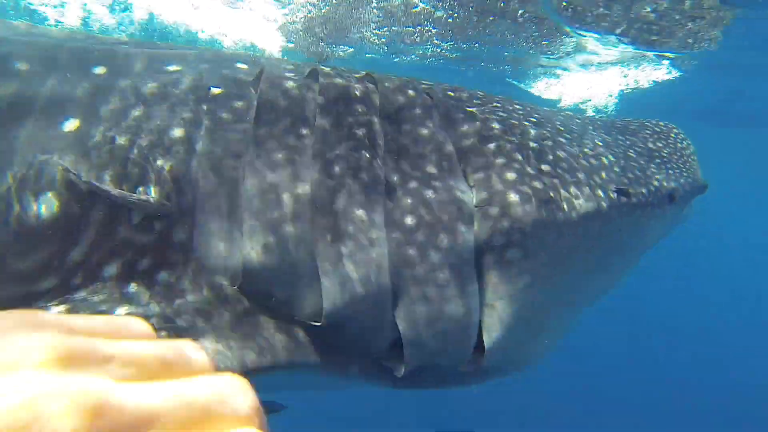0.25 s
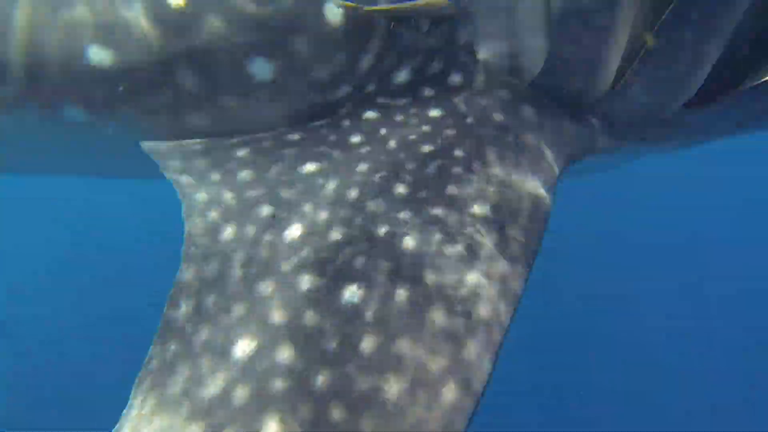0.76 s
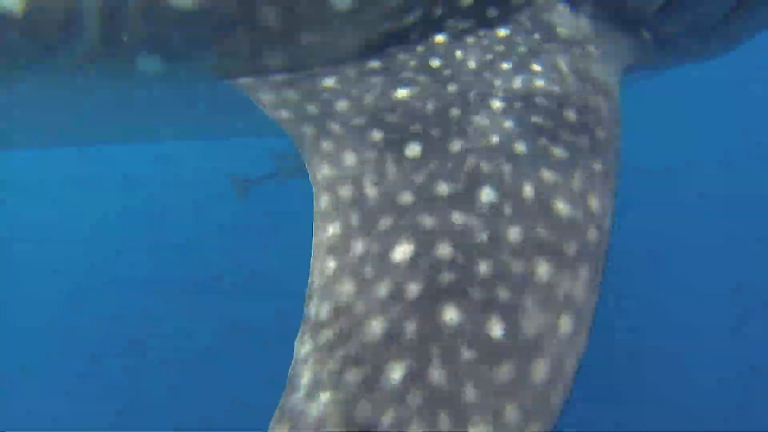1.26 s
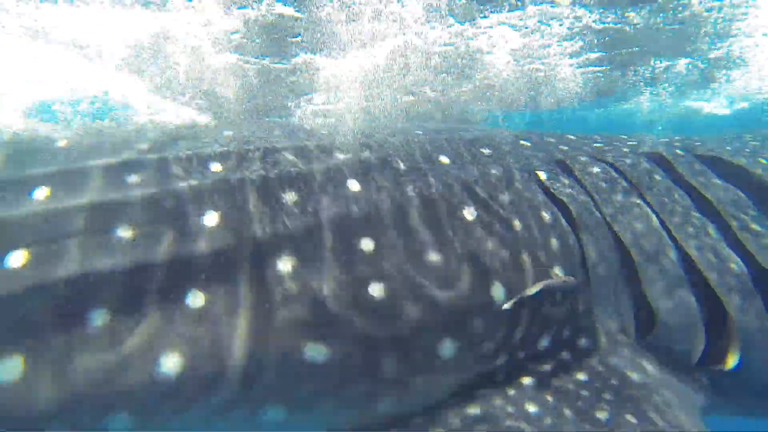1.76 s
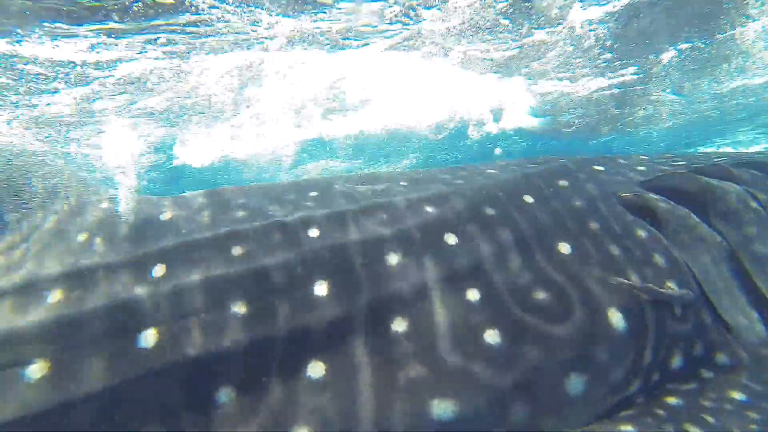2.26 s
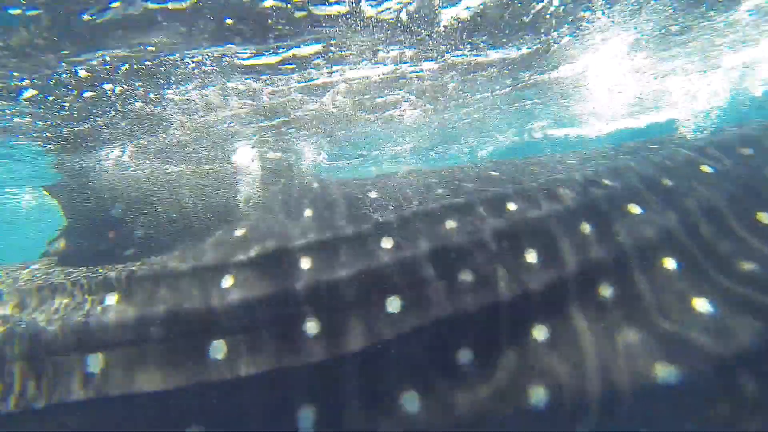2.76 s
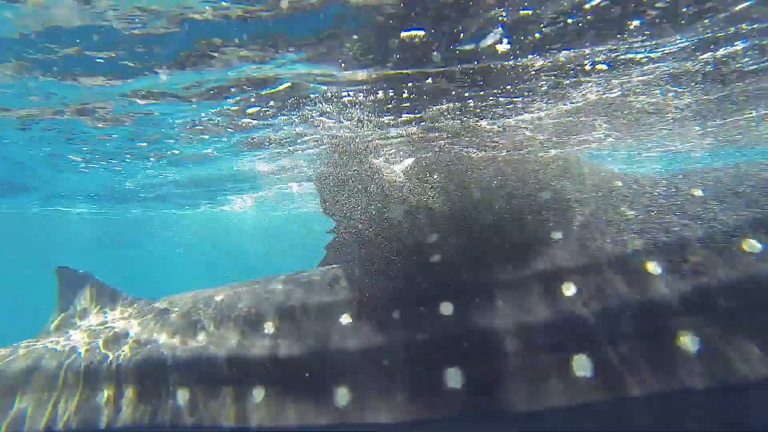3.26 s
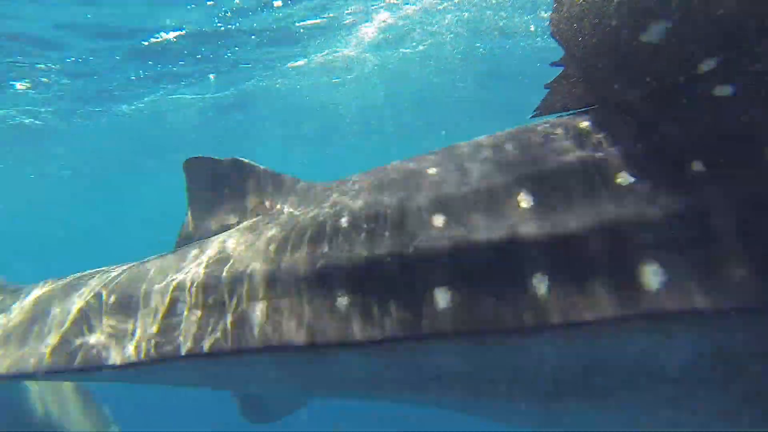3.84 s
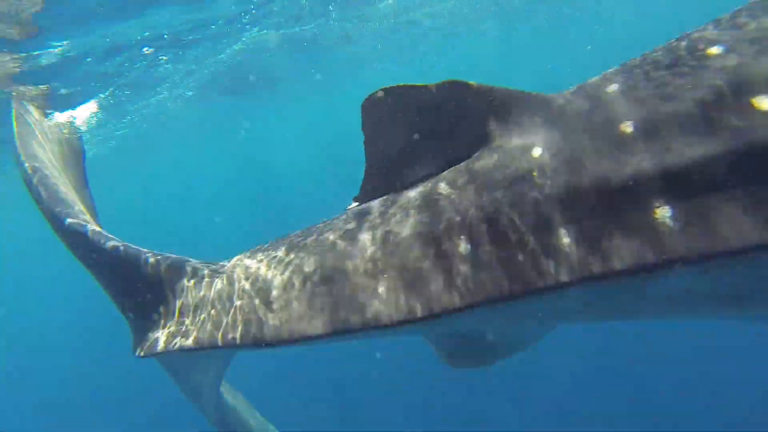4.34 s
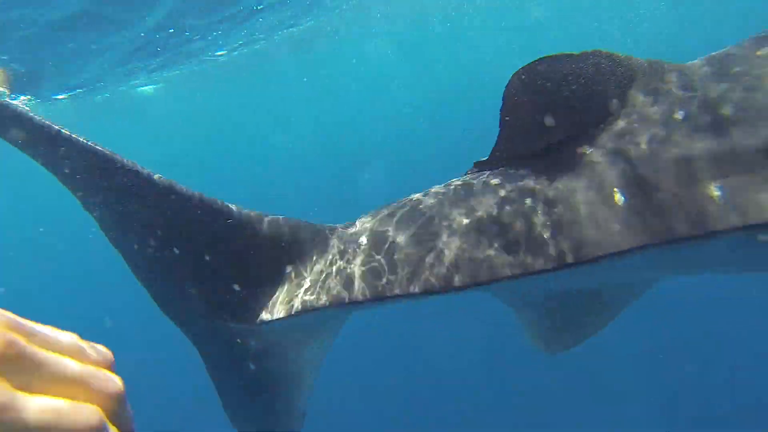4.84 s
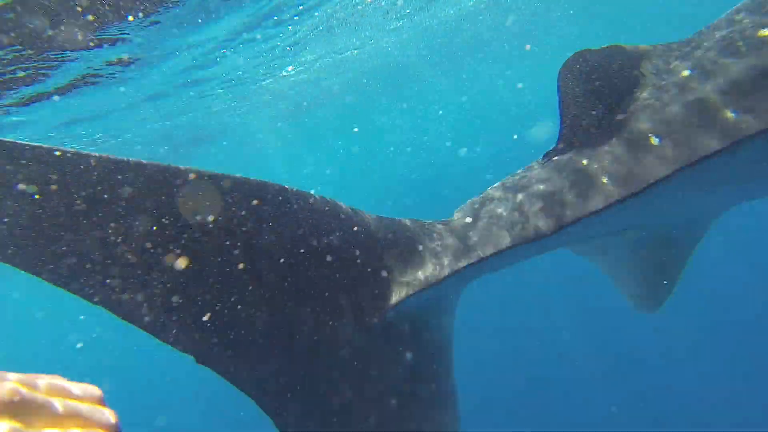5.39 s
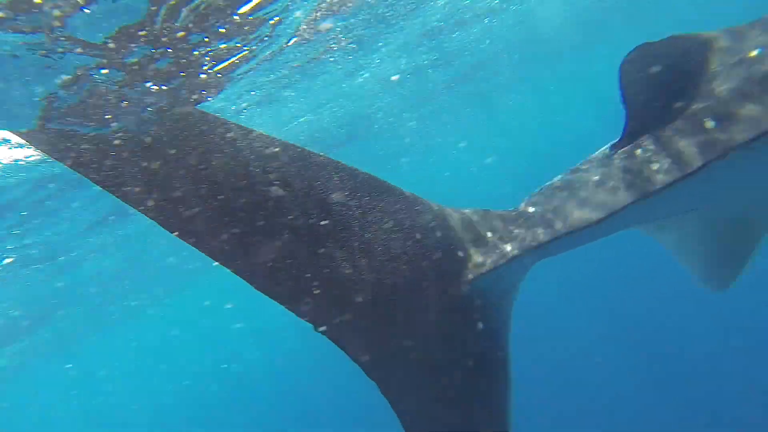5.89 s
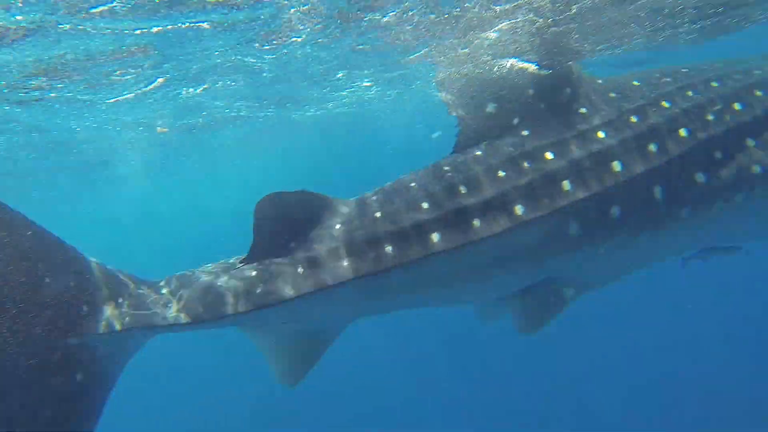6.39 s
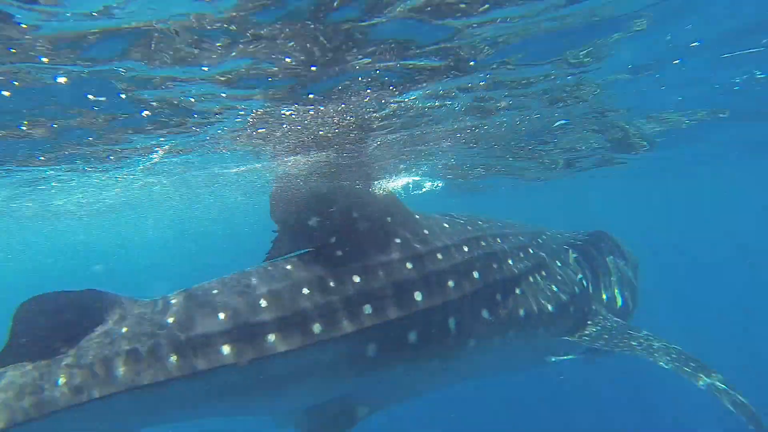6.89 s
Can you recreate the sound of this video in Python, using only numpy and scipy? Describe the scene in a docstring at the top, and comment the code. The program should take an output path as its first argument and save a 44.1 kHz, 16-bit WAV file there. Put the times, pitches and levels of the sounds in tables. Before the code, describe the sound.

Close, muffled underwater sound from a microphone in a hand-held case near the sea surface. A sharp bubble click opens, then a swimming stroke swells into heavy low gulps and burbling, strongest around 0.5-0.7 s. A second push surges at about 1.2 s, with deep thuds and gurgles, loosening by 2.3 s. A small splash of froth and a crisp plink come around 2.2-2.7 s. Water is calmer until 3.7 s, then rapid glugging builds to 4.2-4.6 s and trails off past 5 s. A bright burst of bubble plinks stands out at 5-5.1 s. Low shoves return from 5.5 s, and a final swirling, gulping stroke runs from 6 to 7 s. Throughout, an idling boat rattles and knocks in an even throb of nearly six pulses per second, clearer early and weaker after 3 s, amid fine fizz, smooth hiss and a barely audible whine.

```python
"""Swimming strokes just under the sea surface push water round a hand-held camera case.
Filtered noise makes the buffeting, burble and swirl; short wobbling tones make the gulps and gurgles.
Close bubbles plink as brief decaying sines. Behind them an evenly throbbing rattle of resonant noise
suggests an idling boat, in a fizz of random impulses, a smooth hiss and a faint electronic whine."""
import sys
import numpy as np
from scipy import signal
from scipy.fft import rfft, irfft, next_fast_len
from scipy.io import wavfile
from scipy.ndimage import uniform_filter1d

SR = 44100
rng = np.random.default_rng(int(sys.argv[2]) if len(sys.argv) > 2 else 0)


def file_out(sig):
    """Save sig as 16-bit WAV at sys.argv[1]."""
    # one column per channel
    cols = np.atleast_2d(sig).T
    # limit, then scale
    lim = np.clip(cols, -1, 1)
    pcm = np.round(lim * 32767).astype(np.int16)
    wavfile.write(sys.argv[1], SR, pcm)


N = 313992
T = np.arange(N) / SR

# whine of the camera's electronics: f/Hz, rms level/dB
WHINE_TONES = [(6594, -81.5), (8812, -86), (10429, -88.5), (13127, -89)]

# relative spectra of the tiny-bubble fizz, the even sea hiss and the churning froth: f/Hz, level/dB
FIZZ_SPECTRUM = [(2400, 1.5), (3300, -2), (4000, 3), (4450, -2.5), (4700, -0.5), (4900, -3.5), (5080, 0.5),
                 (5350, -13.5), (6400, -14.5), (9000, -17.5), (15000, -37)]
HISS_SPECTRUM = [(250, 21), (350, 17), (490, 10.5), (600, 1), (1300, 0), (4000, -11), (5800, -13),
                 (6350, -10), (7000, -14), (9300, -16.5), (11500, -20), (13500, -19.5), (14100, -26.5),
                 (15200, -21.5)]
CHURN_SPECTRUM = [(1400, -18.5), (1750, -0.5), (2050, -2.5), (2400, 3.5), (2850, -4.5), (3080, -1),
                  (3500, -8), (4100, -19), (5000, -31.5)]
# fizz fader, before a fixed lift: t/s, level/dB
FIZZ_LEVEL = [(0, -49.5), (.2, -53.5), (.7, -55), (1.22, -55), (1.7, -57.5), (3.4, -56.5), (4.8, -59.5),
              (5.1, -57.5), (5.5, -57), (7.12, -54)]
# froth splashing at the surface, before a fixed lift: t/s, peak level/dB, length/s
SPLASHES_OF_FROTH = [(0.243, -44, 0.24), (1.004, -53, .05), (1.282, -46.5, 0.087), (2.19, -46.5, .12),
                     (2.281, -40.5, 0.023), (2.564, -41, 0.036), (2.74, -47, .07), (2.65, -51.5, 1),
                     (4.503, -49.5, 0.99), (5.12, -44, 0.51), (6.903, -46, 0.028), (6.98, -43.5, 0.015),
                     (7.102, -46.5, 0.043)]
SIMMER_DB = -51.5  # froth between splashes, before the same lift
GUST_DB, BURST_SPREAD_DB = 1.5, 5.2  # gusting of the churn; unevenness of its tiny bursts

# resonances of the boat through the case: f/Hz, width/Hz, relative level/dB
BOAT_RESONANCES = [(699, 73, -9.5), (940, 830, -18.5), (845, 63, -5), (1041, 120, -11), (1205, 72, -6.5),
                   (1546, 99, -5.5), (1758, 235, 1.5), (1847, 120, -2.5), (2283, 152, -1.5),
                   (2434, 610, -9.5), (2750, 50, -8.5), (2980, 210, -14)]
# boat fader as the case turns, before a fixed trim: t/s, level/dB
BOAT_LEVEL = [(0, -36.5), (.45, -39.5), (.65, -38), (.85, -38.5), (1.0, -37.5), (1.33, -35.5), (1.6, -38),
              (2.05, -38), (2.4, -37), (2.6, -38.5), (3.0, -41.5), (3.55, -46.5), (4.15, -43),
              (4.75, -43.5), (5.15, -40.5), (5.75, -43.5), (6.35, -42), (6.8, -42), (7.12, -42.5)]
# shaft speed: t/s, turn rate/Hz
SHAFT_SPEED = [(0, 5.699), (3, 5.69), (4.5, 5.7), (5.7, 5.81), (7.12, 5.71)]
# loudness through one turn, with two knocks: share of the turn, relative level/dB
TURN_SHAPE = [(0, -2.2), (.3, -3.8), (.42, -3.2), (.48, 2.6), (.53, 3.6), (.59, 1.2), (.69, 4.5),
              (.76, 1.4), (.82, -1.6), (.9, -.8)]
# depth of the throb: t/s, factor on the dB of the turn shape
THROB_DEPTH_CURVE = [(0, 1), (1.7, 0.93), (2.3, 0.84), (7.12, 1)]
RATTLE_ROUGH_DB = 1.8

# single near bubbles: t/s, f/Hz, level/dB, ring t60/s, start pitch over final pitch
NEAR_BUBBLES = [(.009, 1000, -13.5, 0.0055, 0.87), (0.017, 487, -30.5, 0.035, 2.3),
                (0.159, 423, -25, 0.033, 0.71), (1.165, 4100, -35, .012, 1.05),
                (1.254, 428, -24, 0.045, 0.6), (1.3075, 4570, -25.5, 0.013, 1.05),
                (2.248, 2800, -27.5, 0.021, 1.14), (2.58, 4600, -28, .003, 1.2),
                (2.626, 2700, -13, 0.0047, 1), (3.062, 354, -29, 0.023, 1.6),
                (3.473, 850, -30.5, 0.036, 0.94), (3.476, 336, -31, .03, 1.3),
                (3.535, 1220, -40, .03, 0.81), (3.546, 1530, -33, 0.03, 0.9),
                (3.833, 4750, -40, 0.015, 1.03), (4.106, 6200, -44, 0.013, 1.2),
                (4.435, 3586, -28.5, 0.014, 0.84), (4.57, 4700, -39, .008, 1.05),
                (4.600, 337, -31, 0.15, 0.72), (4.9783, 3020, -3, 0.014, 1.15),
                (4.995, 2360, -21, 0.022, 0.87), (5.031, 540, -35, 0.041, 1.2),
                (5.062, 520, -37, 0.068, 1.1), (5.051, 2800, -26, 0.022, 1.1),
                (5.060, 3203, -23, 0.012, 1.1), (5.0668, 5230, -14, 0.0011, 0.92),
                (5.0678, 4660, -26, 0.0083, 1), (5.0712, 7700, -34, 0.0039, 1.17),
                (5.079, 1687, -16.5, 0.03, 1.28), (5.087, 6320, -36, 0.013, 1.03),
                (5.099, 3650, -22.5, 0.017, 0.98), (5.1205, 820, -27.5, 0.037, 1.6),
                (5.203, 6100, -43, .008, 1.05), (5.3607, 3750, -27, 0.012, 0.64),
                (5.866, 7450, -33, 0.006, 1.05), (5.917, 3610, -32, 0.013, 1.03),
                (5.931, 5000, -33, .002, 1.2), (6.046, 378, -27, 0.059, 1.1),
                (6.076, 2210, -27, 0.028, 1.14), (6.131, 1240, -35, 0.05, 1.3),
                (6.233, 3100, -32, .018, 0.82), (6.385, 430, -33, 0.06, 0.73)]
# drifting clouds of small bubbles: t/s, spread/s, level of the strongest/dB, bubble rate/Hz
BUBBLE_CLOUDS = [(4.72, 0.15, -34, 114), (5.14, 0.095, -31, 210), (5.36, .03, -37, 220)]

# relative spectra of the buffeting, burble and swirl: f/Hz, level/dB
BUFFET_SPECTRUM = [(5, -25), (10, -7), (18, -2), (27, 1), (37, -9), (50, -11), (68, -16), (100, -30),
                   (200, -60)]
BURBLE_SPECTRUM = [(50, -22), (70, -7.5), (83, 5), (96, -3.5), (116, 5), (135, -8.5), (160, -7), (220, -26)]
SWIRL_SPECTRUM = [(100, -1), (145, 0.5), (185, 5), (260, -1.5), (340, -7.5), (400, -19.5), (500, -20.5),
                  (600, -28.5), (1200, -31.5)]
# deep buffeting fader: t/s, level/dB
BUFFET_LEVEL = [(0, -25), (.25, -32.5), (.7, -20.5), (1.3, -21.5), (1.95, -22), (2.25, -31), (3.1, -27.5),
                (3.8, -31.5), (4.35, -25.5), (4.8, -27), (5.7, -32), (6.15, -22.5), (6.55, -28.5),
                (7.12, -24.5)]
# slow shoves of water on the case: t/s, f/Hz, peak level/dB, length/s
WATER_SHOVES = [(.952, 32.3, -15, 0.029), (1.24, 27.2, -17, 0.036), (1.385, 28.5, -7, 0.033),
                (2.925, 62, -22, .035), (4.35, 27.5, -15.5, 0.0805), (4.452, 75, -16, .03),
                (4.635, 68.3, -20, .04), (5.49, 26.3, -15, 0.055), (5.82, 26.7, -12.5, 0.033),
                (5.982, 33.5, -10, 0.035), (6.035, 27.6, -17, .035), (6.23, 30, -17.5, 0.038)]
# separate gulps of churned air: t/s, f/Hz, peak level/dB, length/s
AIR_GULPS = [(.105, 116.8, -26.5, 0.034), (.17, 124, -25.5, 0.029), (.244, 123, -21.5, .04),
             (.3, 125.8, -19.5, 0.045), (.41, 119.8, -16.5, 0.037), (.482, 117.6, -11, .052),
             (.535, 117.7, -13, 0.027), (.585, 128, -11, 0.05), (.643, 122.2, -8.5, 0.034),
             (.717, 110.3, -14.5, 0.041), (.777, 111.5, -15.5, 0.033), (.83, 107.6, -23, 0.026),
             (.93, 113, -32, 0.026), (.995, 117, -28, .03), (1.05, 112.6, -29, 0.027),
             (1.115, 120, -28.5, .028), (1.187, 132.4, -17.5, 0.02), (1.303, 130, -18.5, 0.019),
             (1.37, 128, -11, 0.024), (1.429, 126.4, -15, 0.023), (1.489, 131.6, -11.5, 0.028),
             (1.562, 117.4, -16.5, 0.026), (1.627, 116.3, -21, 0.028), (1.745, 109, -13, 0.026),
             (1.832, 102.3, -20, 0.031), (1.895, 120.8, -23.5, 0.0322), (1.94, 120.3, -22, .03),
             (1.994, 114.5, -23, 0.036), (2.061, 117.4, -22, 0.032), (2.118, 119.8, -21.5, 0.023),
             (2.18, 116.2, -22, .028), (2.234, 123.3, -19, 0.028), (2.298, 117.5, -21.5, .032),
             (2.644, 123.8, -17.5, 0.025), (3.835, 121, -24, 0.035), (3.895, 120.3, -24.5, 0.028),
             (3.955, 115, -22, .03), (4.01, 116, -22, .028), (4.069, 121, -16, 0.03),
             (4.133, 118, -14.5, 0.036), (4.19, 124.5, -13, .026), (4.24, 126, -8.5, 0.034),
             (4.297, 129.5, -12.5, 0.028), (4.361, 124.8, -8.5, .033), (4.432, 114.5, -10, 0.031),
             (4.504, 109, -12, 0.028), (4.559, 116.8, -12.5, 0.022), (4.616, 106.7, -14.5, 0.0257),
             (4.661, 104, -18, 0.028), (4.73, 107, -21.5, 0.024), (4.793, 119, -17, 0.023),
             (4.922, 115.2, -19, .035), (5.006, 100.4, -16.5, 0.031), (5.065, 104, -16.5, .028),
             (5.121, 112.3, -14, .028), (5.181, 106.3, -18, 0.026), (6.253, 128, -19.5, 0.022),
             (6.338, 109.4, -17.5, 0.027), (6.399, 116.6, -21, 0.03), (6.541, 116.8, -17.5, 0.038),
             (6.614, 115.4, -17, .03), (6.67, 120, -14.5, 0.024), (6.737, 123, -12.5, 0.023),
             (6.947, 112.5, -19.5, 0.023)]
# gurgles, where a pocket of air tears up against the case: t/s, f/Hz, peak level/dB, length/s
AIR_GURGLES = [(.02, 280, -25.5, 0.028), (.17, 240, -30.5, 0.022), (.225, 283, -28.5, .022),
               (.334, 211, -25.5, 0.031), (.424, 212, -25, .025), (.479, 213, -27, .022),
               (.753, 196.5, -33, 0.024), (.86, 214, -32, 0.026), (.945, 211, -30.5, 0.023),
               (1.08, 226.6, -33, .035), (1.135, 185.5, -28, 0.029), (1.195, 192.6, -19, .022),
               (1.244, 202.5, -24, 0.024), (1.328, 205, -18, .032), (1.408, 222.6, -27, .03),
               (1.489, 199.3, -20.5, .03), (1.812, 253, -27.5, 0.029), (1.879, 256, -30.5, .025),
               (2.544, 249, -29, 0.034), (2.853, 208.2, -27, 0.021), (3.045, 219.5, -27, 0.036),
               (3.77, 213.4, -33, 0.034), (3.833, 234.5, -25.5, .028), (3.899, 278.6, -29.5, .028),
               (3.952, 206, -22, 0.014), (4.07, 218.5, -24.5, 0.028), (4.163, 219.2, -25, 0.04),
               (4.232, 262, -25, 0.027), (4.536, 197.5, -28, 0.028), (4.74, 201, -32.5, 0.033),
               (4.869, 207, -29, 0.027), (5.11, 196, -32, 0.03), (5.227, 204, -32, .025),
               (5.365, 217, -29, 0.02), (5.483, 251, -30.5, 0.035), (6.008, 256.5, -30, 0.026),
               (6.065, 169, -25.5, 0.017), (6.125, 190, -25, 0.043), (6.185, 174.6, -26, .03),
               (6.235, 215.3, -24, 0.029), (6.317, 244, -24.5, .018), (6.461, 242.5, -26.5, 0.031),
               (6.622, 213.3, -27, 0.029), (6.695, 269.5, -29.5, 0.028), (6.748, 268.4, -29.5, .025),
               (7.02, 227, -31, 0.038)]
# swimming strokes: start t/s, attack/s, time until the burble crests/s, length/s, swirl level/dB,
#   swirl level in the wake/dB, burble level before cap and trim/dB,
#   relative flow speed in the push, relative flow speed in the wake
SWIM_STROKES = [(0.02, .16, 0.56, .77, -32, -49, -19, 1.08, .97),
                (1.129, 0.078, 0.33, 1.927, -28, -38.5, -20, 1.02, .99),
                (3.689, 0.1707, 0.62, 1.83, -38.5, -38, -20, 1.1, .88),
                (5.932, 0.1286, 0.49, 1.2, -30.5, -42.5, -24.5, 1.1, .99)]
STROKE_RELEASE_S, SWIRL_FADE_S = 0.0901, 0.47
CALM_SWIRL_DB, CALM_BURBLE_DB = -45.5, -37.5  # between strokes; the burble is trimmed later
BURBLE_BUILD_DB_PER_S, BURBLE_FADE_DB_PER_S = 24.5, 7
SLOWING_S, CALM_SPEED = .6, .94  # flow slows after each push; relative speed between strokes
# the arm comes back and stirs the water just before a stroke ends
RECOVERY_DB, RECOVERY_LEAD_S, RECOVERY_S = -42.5, 0.07, 0.86
GULPS_PER_S, GULP_HZ, GULP_S = 16.4, 117, .028  # nearly even train of soft gulps; base pitch

TOP_HZ = 15250  # upper edge of the passband


def undb(db):
    """Decibels to gain."""
    return 10 ** (np.asarray(db) / 20)


def unit(x):
    """Scale to rms 1."""
    return x / np.sqrt(np.mean(x ** 2))


def curves(table):
    """Draw each column of a table as straight lines in time."""
    s, *columns = np.transpose(table)
    return [np.interp(T, s, c) for c in columns]


def hump(t, length):
    """A smooth swell that peaks at t = 0 and stays above half height for the given length."""
    return 2 ** -((2 * t / length) ** 2)


def walk(rate):
    """Smooth random wandering with an rms of 1."""
    k = max(int(SR / rate), 1)
    steps = np.repeat(rng.standard_normal(N // k + 1), k)[:N]
    return unit(uniform_filter1d(steps, k))


def patter(rate, spread_db):
    """Random impulses, on average so many a second, of uneven size and either sign."""
    chance, size = rng.random(N), rng.standard_normal(N)
    return (chance < rate / SR) * rng.choice([-1, 1], N) * undb(spread_db * size)


def colour(x, points):
    """Shape a sound by a spectrum table, with falling skirts beyond its ends; rms 1."""
    hz, db = np.transpose(points)
    size = next_fast_len(N)
    f = np.maximum(np.fft.rfftfreq(size, 1 / SR), 1)
    gain = undb(np.interp(np.log(f), np.log(hz), db))
    skirts = np.minimum(f / hz[0], 1) ** 2 * np.minimum(hz[-1] / f, 1) ** 2
    shaped = irfft(rfft(x, size) * gain * skirts, size)
    return unit(shaped[:N])


def resonate(x, hz, width):
    """A steep-sided resonance: the same band-pass three times."""
    b, a = signal.iirpeak(hz, hz / (2 * width), fs=SR)
    return signal.sosfilt([np.r_[b, a]] * 3, x)


def bubbles(table, settle_s=0.00085, rise_s=0.00049):
    """Each bubble rings briefly; its pitch settles as it rounds off after pinching free."""
    out, t = np.zeros(N + SR), T[:SR // 10]
    for at, hz, db, t60, start_ratio in table:
        pitch = hz * (1 + (start_ratio - 1) * np.exp(-t / settle_s))
        decay = np.exp(-np.log(1000) * t / t60)
        ring = (1 - np.exp(-t / rise_s)) * decay
        start = max(int(at * SR), 0)
        tone = np.sin(2 * np.pi * np.cumsum(pitch) / SR)
        out[start:start + len(t)] += undb(db) * ring * tone
    return out[:N]


def whine():
    """Thin steady sine tones inside the camera."""
    return sum(np.sqrt(2) * undb(db) * np.sin(2 * np.pi * hz * T) for hz, db in WHINE_TONES)


def froth():
    """Churn level in dB: a steady simmer plus the power of a smooth swell for each splash."""
    power = sum((undb(db) * hump(T - at, length)) ** 2 for at, db, length in SPLASHES_OF_FROTH)
    return 10 * np.log10(power + undb(SIMMER_DB) ** 2)


def stray_bubbles(churn_db, count=220, low_hz=2100, octaves=1.3, cycles=40):
    """Rows for faint bubbles shed by the froth; smaller ones are higher, shorter and softer."""
    when, smallness, luck = rng.random((count, 3)).T
    at = when * T[-1]
    hz = low_hz * 2 ** (octaves * smallness)
    db = np.interp(at, T, churn_db) + 10 + 8 * luck ** 2 - 8 * smallness
    return np.column_stack([at, hz, db, cycles / hz, np.ones(count)])


def sea():
    """Froth churns in short gusts and tiny bubbles burst in it, over a smooth hiss."""
    churn_db = froth()
    fizz_db, = curves(FIZZ_LEVEL)
    churn_bursts = colour(patter(3500, spread_db=BURST_SPREAD_DB), CHURN_SPECTRUM)
    churn = churn_bursts * undb(churn_db + GUST_DB * walk(25) + 2.5)
    fizz = colour(patter(9000, spread_db=5.5), FIZZ_SPECTRUM) * undb(fizz_db + 2.0)
    hiss = colour(rng.standard_normal(N), HISS_SPECTRUM) * undb(-45.0)
    return churn + bubbles(stray_bubbles(churn_db)) + fizz + hiss


def boat(lag_per_octave=0.062):
    """A rough rattle knocks twice each shaft turn and rings the case; low resonances swell last."""
    share, turn_db = np.transpose(TURN_SHAPE)
    level_db, = curves(BOAT_LEVEL)
    depth, = curves(THROB_DEPTH_CURVE)
    turn_hz, = curves(SHAFT_SPEED)
    shaft = np.cumsum(turn_hz) / SR
    roughness = undb(RATTLE_ROUGH_DB * walk(180))
    out = np.zeros(N)
    for hz, width, mode_db in BOAT_RESONANCES:
        # the lag is a share of a turn, for resonances below 1750 Hz only
        turns = shaft + lag_per_octave * min(np.log2(hz / 1750), 0)
        throb_db = depth * np.interp(turns % 1, share, turn_db, period=1)
        rattle = roughness * rng.standard_normal(N)
        out += resonate(rattle, hz, width) * undb(mode_db + throb_db)
    return unit(out) * undb(level_db - 1.63)


def cloud_bubbles(low_hz=2300, octaves=0.78, cycles=26, spread_db=9, count=300):
    """Rows for the bubbles of each cloud: many small ones of mixed size, thickest at its middle."""
    rows = []
    for centre, spread_s, db, per_s in BUBBLE_CLOUDS:
        in_cloud = int(3 * spread_s * per_s)
        smallness, luck, early, late = rng.random((count, 4))[:in_cloud].T
        hz = low_hz * 2 ** (octaves * smallness)
        at = centre + np.sqrt(6) * spread_s * (early - late)
        rows.append(np.column_stack([at, hz, db - spread_db * luck, cycles / hz, 1 + luck / 10]))
    return np.vstack(rows)


def surface_scatter(x, wet_db=-15, t60_s=0.06):
    """The rippled surface and the froth throw a near sound back as a short, grainy tail."""
    t = T[:SR // 10]
    tail = rng.standard_normal(len(t)) * np.exp(-np.log(1000) * t / t60_s)
    wet = signal.fftconvolve(x, tail / np.linalg.norm(tail))[:N]
    return x + undb(wet_db) * wet


def near_bubbles():
    """Single plinks and drifting clouds ring close to the case, with scatter off the surface."""
    return surface_scatter(bubbles(NEAR_BUBBLES) + bubbles(cloud_bubbles()))


def eddies(points, span_s, speed=1):
    """Turbulent pressure: flutters fast, holds its strength over span_s; faster flow raises its pitch."""
    travelled = np.cumsum(np.ones(N) * speed)
    noise = colour(rng.standard_normal(N), points)
    x = np.interp(travelled, np.arange(N), noise)
    k = max(int(span_s * SR), 1)
    power = uniform_filter1d(uniform_filter1d(x ** 2, k), k)
    return x / np.sqrt(power)


def swells(table, wander, wander_rate=70, sag_per_s=0., tail=0.093):
    """A wobbling tone per (t/s, f/Hz, level/dB, length/s) row: swells, may sag, dies a little slower."""
    out, wobble = np.zeros(N), 1 + wander * walk(wander_rate)
    for (at, hz, db, length), start in zip(table, rng.random(len(table))):
        near = slice(*np.searchsorted(T, [at - 2 * length, at + 2 * length]))
        t = T[near] - at
        pitch = hz * wobble[near] * np.exp(-sag_per_s * t)
        envelope = hump(t, length * (1 + tail * np.sign(t)))
        out[near] += undb(db) * envelope * np.sin(2 * np.pi * (np.cumsum(pitch) / SR + start))
    return out


def blubs(swirl_gain, count=40, low_hz=200, octaves=1.07, cycles=22, above_db=1.5, spread_db=5, fall_db=8):
    """Rows for big bubbles torn off by the swirl; smaller ones are higher, shorter and softer."""
    when, smallness, luck = rng.random((count, 3)).T
    at = when * T[-1]
    hz = low_hz * 2 ** (octaves * smallness)
    swirl_db = 20 * np.log10(np.interp(at, T, swirl_gain))
    db = swirl_db + above_db + spread_db * luck - fall_db * smallness
    return np.column_stack([at, hz, db, cycles / hz, np.ones(count)])


def soft_gulps(air_gain, speed, jitter=0.1227, scatter=0.058, spread_db=2.4, above_db=2.0, clear_s=.04):
    """Rows for soft gulps between the separate ones: louder with more air, higher in faster flow."""
    late, size, luck = rng.standard_normal((N // 2000, 3)).T
    at = (np.arange(len(late)) + jitter * late) / GULPS_PER_S
    hz = GULP_HZ * np.interp(at, T, speed) * (1 + scatter * size)
    db = 20 * np.log10(np.interp(at, T, air_gain)) + above_db + spread_db * luck
    free = np.abs(at[:, None] - np.array(AIR_GULPS)[:, 0]).min(axis=1) > clear_s
    return np.column_stack([at, hz, db, np.full(len(at), GULP_S)])[free]


def strokes():
    """Swirl gain, burble gain and flow speed: a stroke swirls, then churns in air that burbles on."""
    swirl_power, burble_power = undb(CALM_SWIRL_DB) ** 2, undb(CALM_BURBLE_DB) ** 2
    speed = CALM_SPEED
    for (start, attack_s, crest_s, length, swirl_db, wake_db, burble_db,
         push_speed, wake_speed) in SWIM_STROKES:
        age = np.maximum(T - start, 0)
        release = np.exp(-np.maximum(age - length, 0) / STROKE_RELEASE_S)
        moving = np.minimum(age / attack_s, 1) * release
        push_db = wake_db + (swirl_db - wake_db) * np.exp(-(age / SWIRL_FADE_S) ** 2 / 2)
        recovery = undb(RECOVERY_DB) * hump(age - length + RECOVERY_LEAD_S, RECOVERY_S)
        before_crest_db = (crest_s - age) * BURBLE_BUILD_DB_PER_S
        after_crest_db = (age - crest_s) * BURBLE_FADE_DB_PER_S
        air_db = burble_db - np.maximum(before_crest_db, after_crest_db)
        flow = wake_speed + (push_speed - wake_speed) * np.exp(-(age / SLOWING_S) ** 2 / 2)
        swirl_power = swirl_power + moving ** 2 * (undb(push_db) ** 2 + recovery ** 2)
        burble_power = burble_power + (moving * undb(air_db)) ** 2
        speed = speed + moving * (flow - CALM_SPEED)
    return np.sqrt(swirl_power), np.sqrt(burble_power), speed / speed.mean()


def water(steady_limit_db=-20.0, burble_db=-5.0, flutter_db=2.5):
    """Big eddies shove the case, trapped air burbles and gulps, small eddies swirl and gurgle above it."""
    buffet_db, = curves(BUFFET_LEVEL)
    swirl_gain, burble_gain, speed = strokes()
    buffet = eddies(BUFFET_SPECTRUM, 0.1) * undb(buffet_db)
    shoves = swells(WATER_SHOVES, wander=0.038)
    # in fast flow the burble is capped: the louder air comes as separate gulps
    air_gain = np.minimum(burble_gain, undb(steady_limit_db))
    burble = eddies(BURBLE_SPECTRUM, 0.087, speed) * air_gain * undb(burble_db)
    all_gulps = np.vstack([AIR_GULPS, soft_gulps(air_gain, speed)])
    gulps = swells(all_gulps, wander=0.041, sag_per_s=2.215)
    swirl = eddies(SWIRL_SPECTRUM, 0.056, speed) * swirl_gain * undb(flutter_db * walk(32))
    gurgles = swells(AIR_GURGLES, wander=0.169, wander_rate=220)
    big_bubbles = bubbles(blubs(swirl_gain), rise_s=0.0048)
    return buffet + shoves + burble + gulps + swirl + gurgles + big_bubbles


def case_wall(x, notch_hz=2612, width_hz=150, leak=0.12):
    """The wall of the case passes little at its anti-resonance."""
    notched = signal.lfilter(*signal.iirnotch(notch_hz, notch_hz / width_hz, fs=SR), x)
    return notched + leak * (x - notched)


def scene():
    """The water sounds pass the case wall to one microphone; the whine arises inside."""
    outside = water() + near_bubbles() + boat() + sea()
    return (case_wall(outside) + whine())[None]


def record(dry):
    """The camera cuts the top with a steep low-pass; short fades avoid clicks at both ends."""
    fade = np.minimum(np.minimum(T, T[::-1]) / .004, 1)
    low_pass = signal.ellip(10, .2, 80, TOP_HZ, fs=SR, output="sos")
    return signal.sosfilt(low_pass, dry * fade)


dry = scene()
out = record(dry)
file_out(out)
```